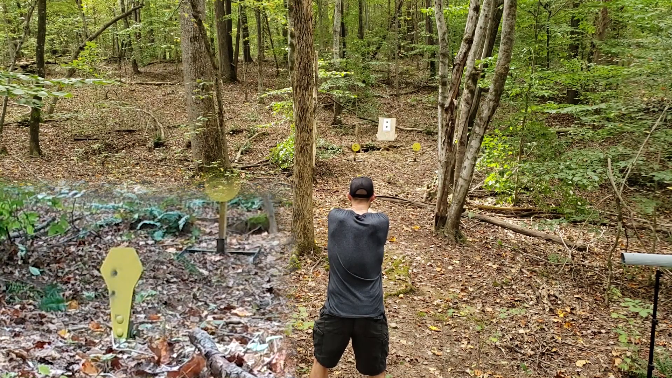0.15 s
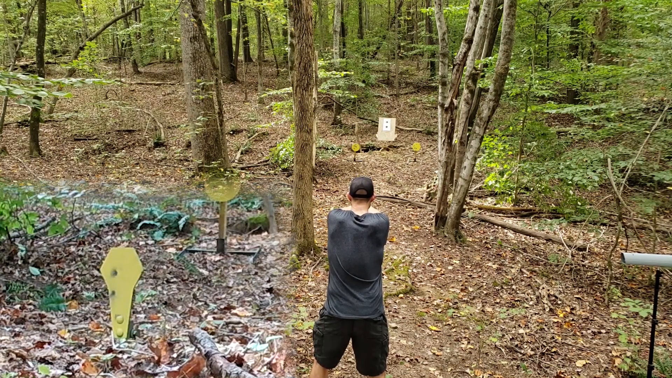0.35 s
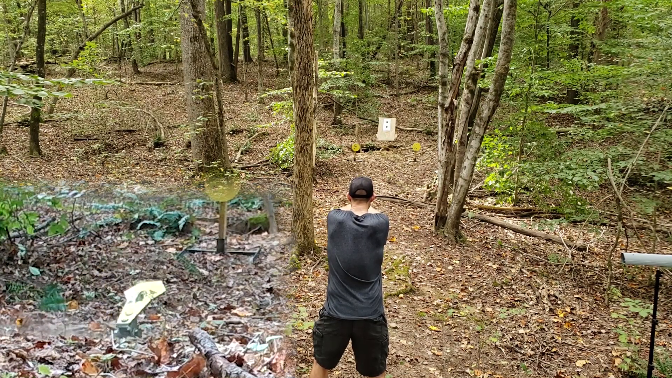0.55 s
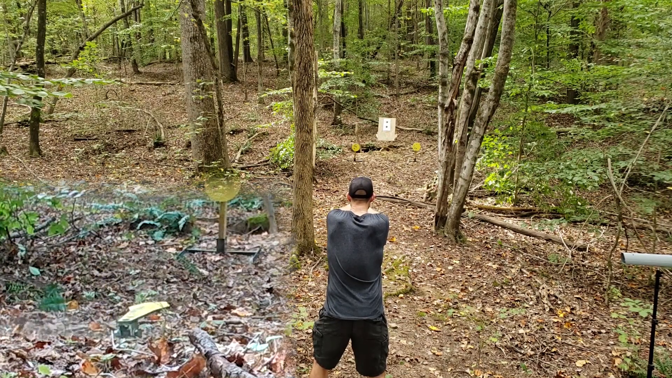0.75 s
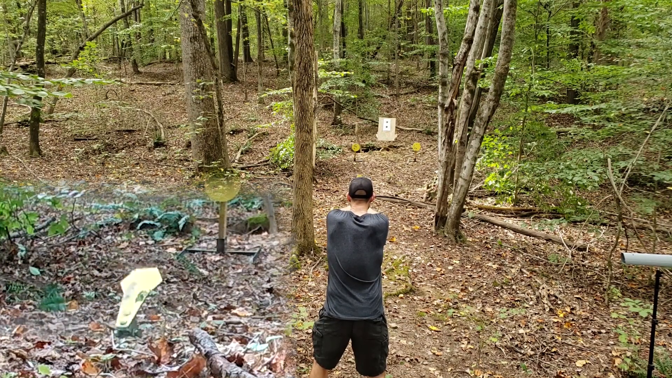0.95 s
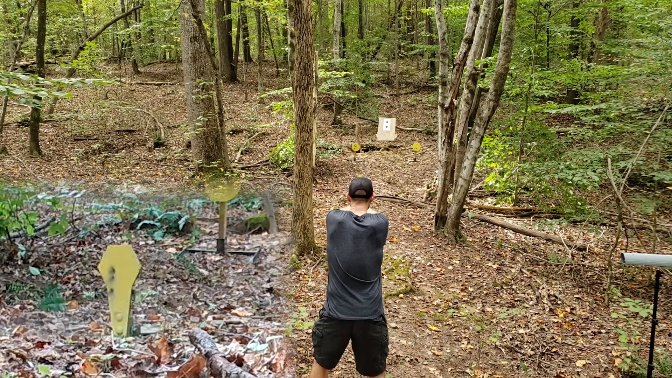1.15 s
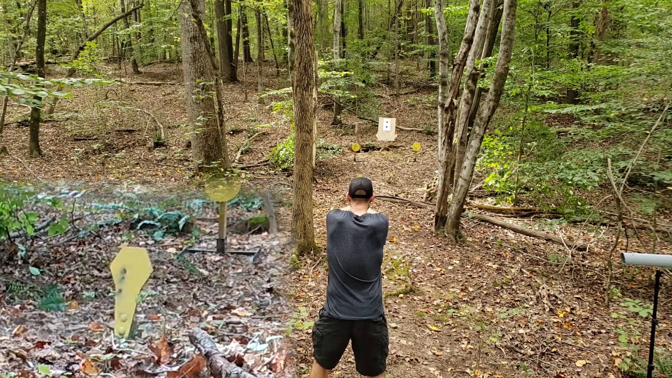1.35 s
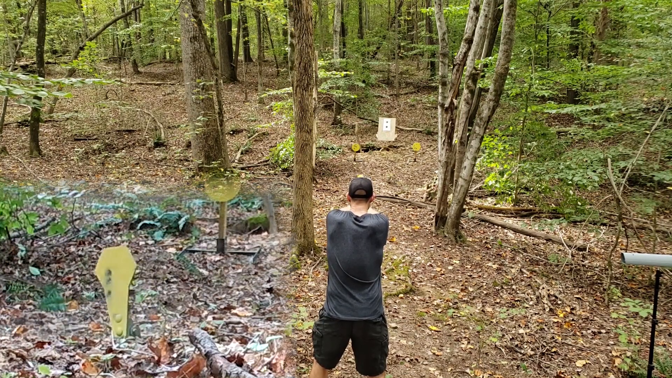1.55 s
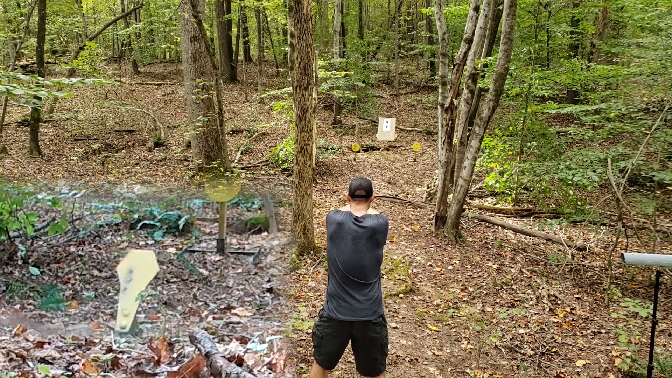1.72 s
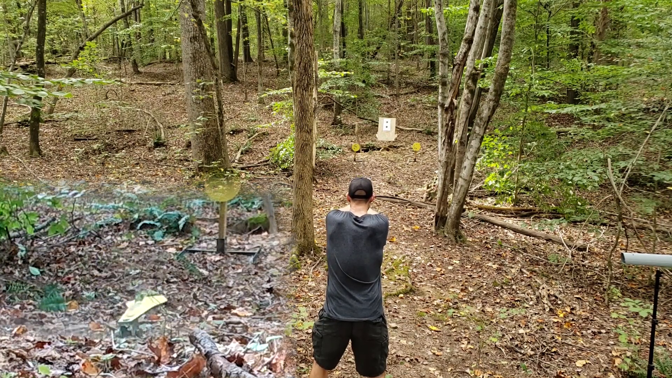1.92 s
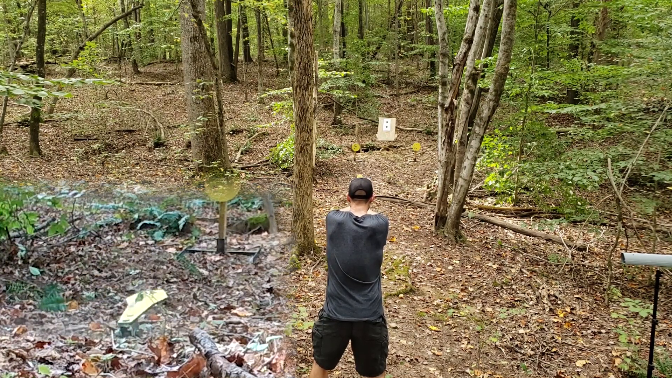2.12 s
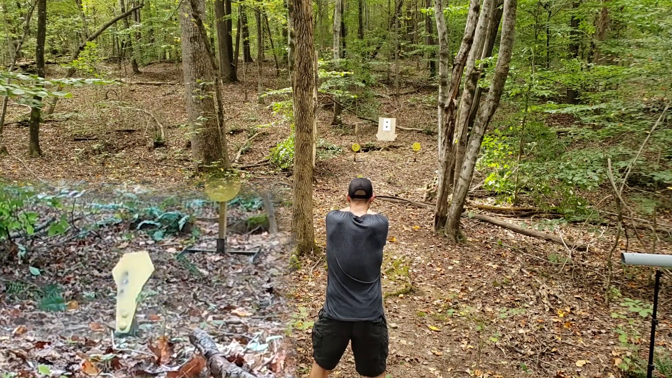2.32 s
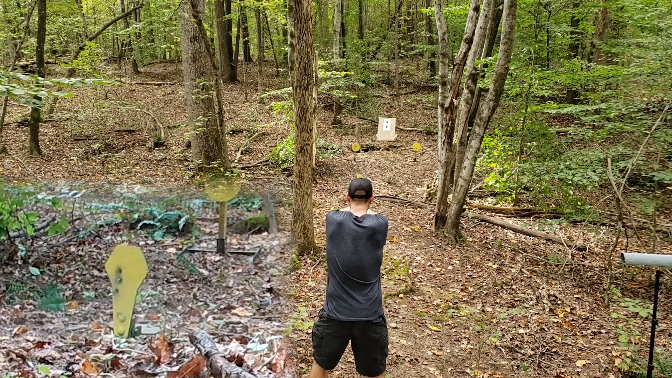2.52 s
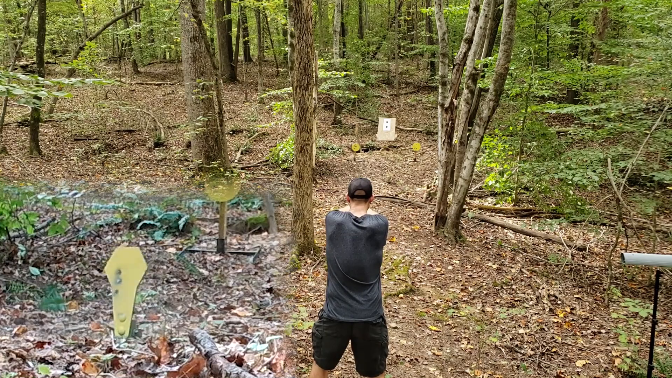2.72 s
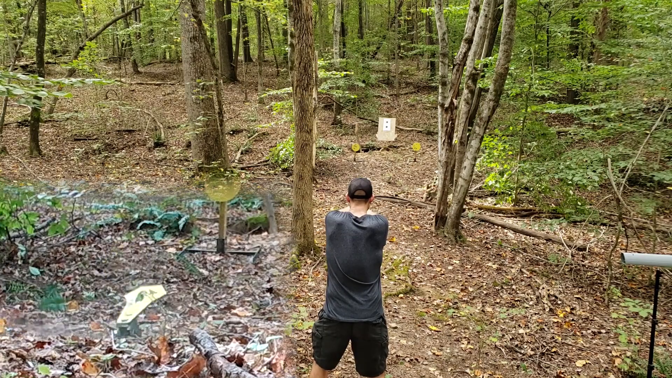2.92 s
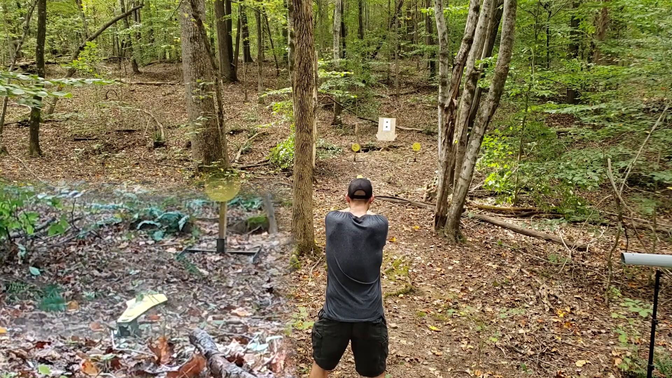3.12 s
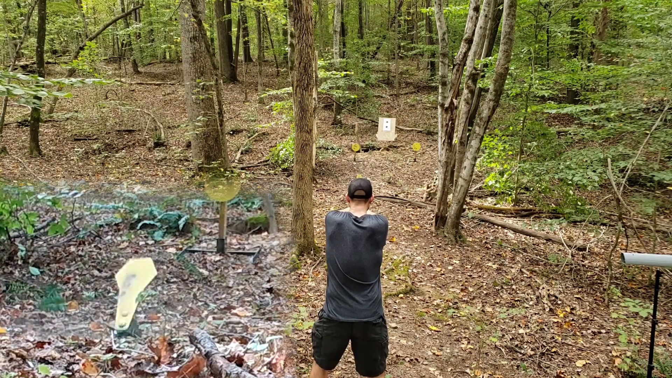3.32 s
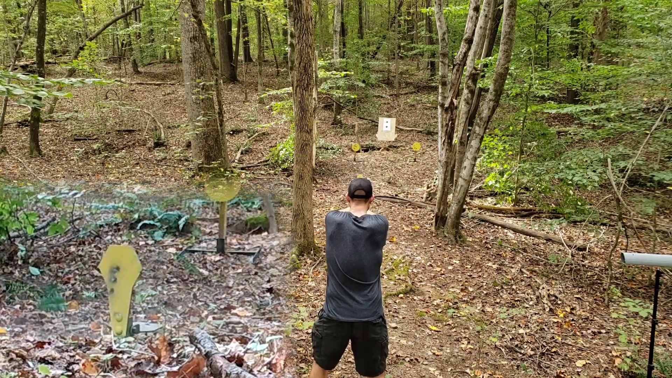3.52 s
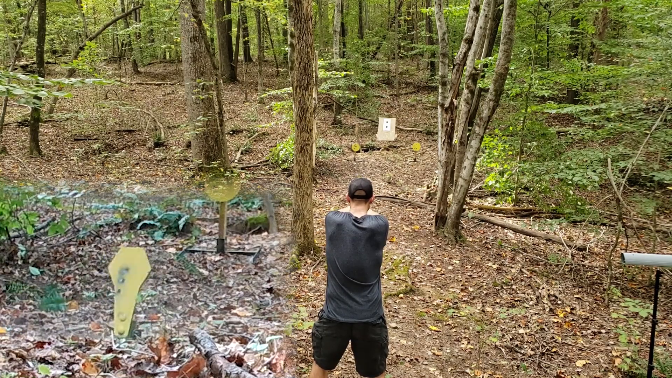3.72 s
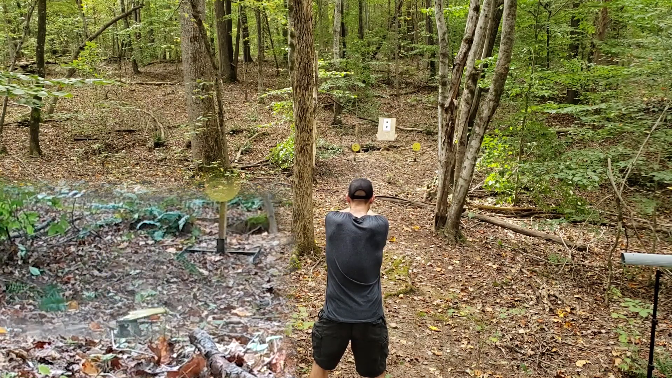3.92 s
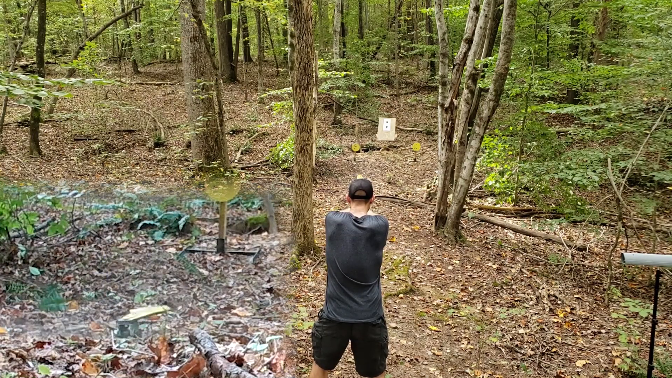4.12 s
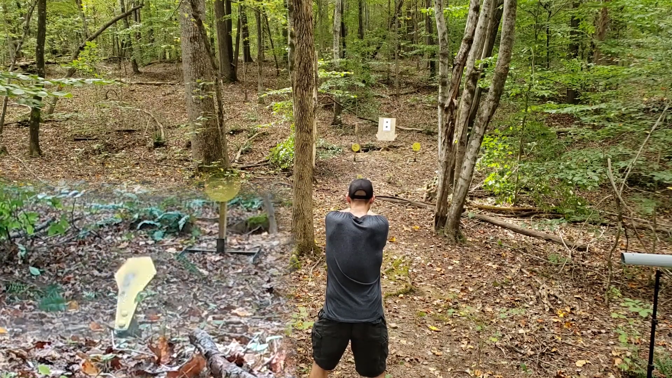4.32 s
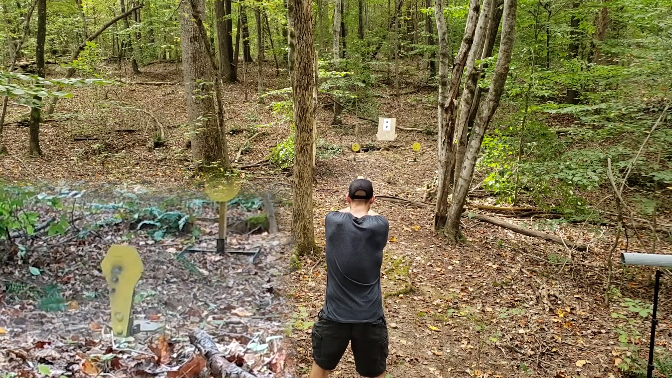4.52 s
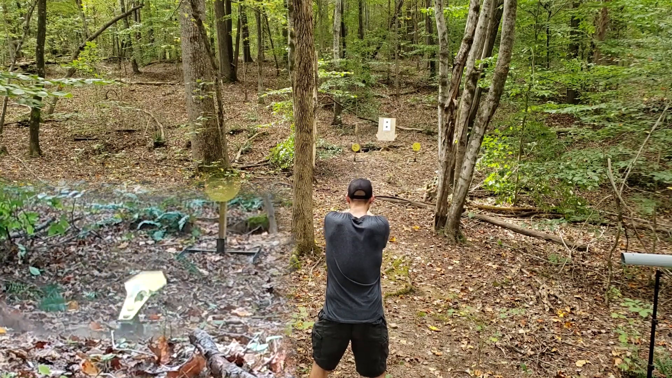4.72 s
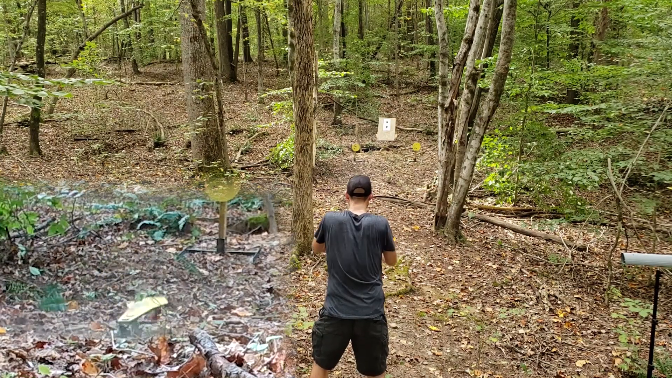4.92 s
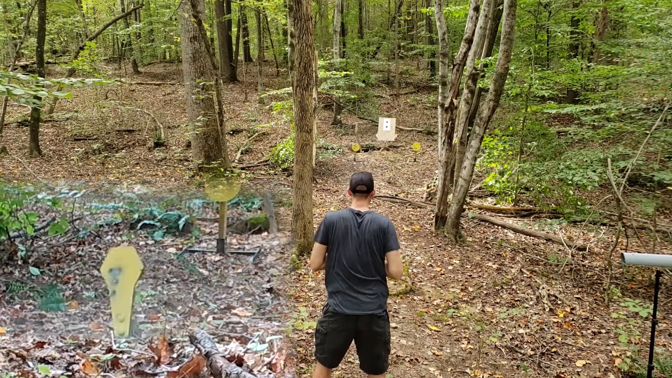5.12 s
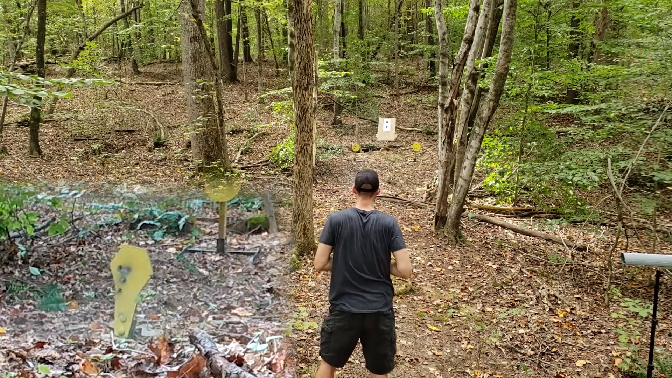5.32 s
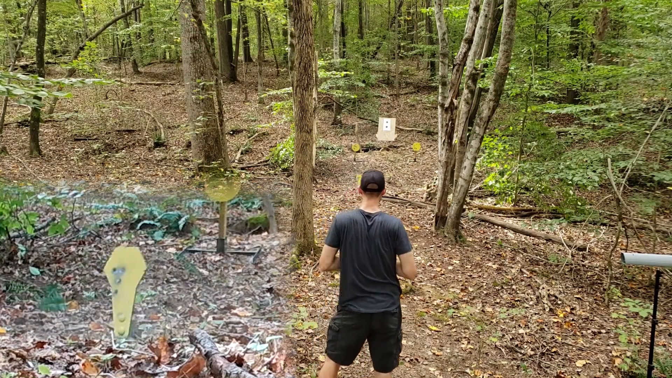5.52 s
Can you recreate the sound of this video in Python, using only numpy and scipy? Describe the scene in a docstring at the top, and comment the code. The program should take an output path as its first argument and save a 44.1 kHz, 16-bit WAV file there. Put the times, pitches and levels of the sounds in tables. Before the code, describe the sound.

A revolver fires five shots in a wood, at about 0.4, 1.7, 2.8, 3.7 and 4.6 seconds. Each is a loud, sudden bang with a short low boom that overloads the microphone. Almost at once the bullet strikes a steel plate with a sharp splat and a brief, very high ring. Quick slaps come back from nearby trunks, followed by a long echo that is still fading when the next shot arrives. After each hit the spring-loaded plate swings back against its stop with a much quieter clank, a tiny rattle and a small rebound, at about 1.1, 2.4, 3.5, 4.5 and 5.2 seconds. Beneath everything are a very soft hush of air and the faint low drone of a distant engine, which swells slightly near 0.9 seconds and slowly sinks. The last echo trails away toward the end, around 5.5 seconds.

```python
"""A revolver fires five shots at a spring-loaded steel target in a wood.
Each bang is a sudden push of gas that overloads the microphone, and the trees send back a long echo.
Each bullet makes the steel plate ring; the spring then swings the plate back to clank on its stop.
Behind it all are a soft hush of air and the drone of a far engine."""
import sys
import numpy as np
from scipy import signal
from scipy.fft import rfft, irfft, next_fast_len
from scipy.io import wavfile

SR = 44100
rng = np.random.default_rng(int(sys.argv[2]) if len(sys.argv) > 2 else 0)


def pcm_store(signal):
    """Save signal as 16-bit PCM."""
    levels = np.round(np.clip(np.atleast_2d(signal), -1, 1) * 32767)
    wavfile.write(sys.argv[1], SR, levels.astype(np.int16).T)


N = 249289
TIME = np.arange(N) / SR


def from_db(db):
    """Turns decibels into a number to multiply by."""
    return 10 ** (np.asarray(db) / 20)


def unit_level(x):
    """Scales a sound to an average (rms) level of 1."""
    return x / np.sqrt(np.mean(x ** 2) + 1e-20)


def filtered(x, hz, kind, order=2):
    """Keeps the lows, the highs or a band of a sound."""
    sections = signal.butter(order, np.minimum(hz, .45 * SR), kind, fs=SR, output="sos")
    return signal.sosfilt(sections, x + 1e-18)


def coloured(x, tone):
    """Shapes plain noise with a table of pitch_hz, level_db; the result has level 1."""
    hz, db = np.transpose(tone)
    size = next_fast_len(len(x))
    pitches_hz = np.maximum(np.fft.rfftfreq(size, 1 / SR), 1)
    gain = from_db(np.interp(np.log(pitches_hz), np.log(hz), db))
    return unit_level(irfft(rfft(x, size) * gain, size)[:len(x)])


def add(track, start_s, sound):
    """Mixes a sound into the track at start_s."""
    start = max(int(round(start_s * SR)), 0)
    track[start:start + len(sound)] += sound[:N - start]


# The tone of the air: pitch_hz, level_db
AIR_TONE = [(20, -13.5), (60, 1.5), (170, -3.5), (300, -14), (700, -16), (1500, -20.5), (2500, -34.5),
            (4000, -49), (8000, -46.5), (16000, -54.5)]

def forest_air():
    """Still air makes a steady, low hush."""
    return coloured(rng.standard_normal(N), AIR_TONE)


def far_engine(start_hz, sink_hz_per_s, waver_hz, start_db, fade_db_per_s):
    """A distant engine drones and wavers, swells once, and slowly gets lower and quieter."""
    wander = unit_level(filtered(rng.standard_normal(N + SR), waver_hz, "low")[SR:])
    pitch_hz = start_hz - sink_hz_per_s * TIME + 1.6 * wander
    hum = np.sqrt(2) * np.sin(2 * np.pi * np.cumsum(pitch_hz) / SR)
    band_hz = pitch_hz.mean() + np.array([-waver_hz, waver_hz])
    rumble = unit_level(filtered(rng.standard_normal(N + SR), band_hz, "band")[SR:])
    swell_db = 6 * np.exp(-((TIME - .88) / .33) ** 2)
    level_db = start_db - fade_db_per_s * TIME + swell_db
    return from_db(level_db) * unit_level(hum + from_db(-5) * rumble)


# Three depths of the wood, each fainter and longer: swell_s, hold_until_s, level_db, fall_db_per_s
UNDERGROWTH = (0.03, 0.0273, -14.5, 600)
NEAR_TREES = (0.01, 0.0461, -23.5, 50)
FAR_TREES = (0.22, 0.17, -36.5, 17.5)

def echo_loudness(t):
    """The echo from each depth of the wood swells, then dies away."""
    return sum(np.minimum(t / swell_s, 1) * from_db(db - fall_db_per_s * np.maximum(t - until_s, 0))
               for swell_s, until_s, db, fall_db_per_s in (UNDERGROWTH, NEAR_TREES, FAR_TREES))


# The tone of the echo: pitch_hz, level_db
ECHO_TONE = [(30, -24.5), (75, -15), (130, -3), (200, -9), (350, -3), (650, -4), (950, -3), (1900, -8),
             (3100, -21), (4000, -15.5), (5000, -23), (7100, -36), (8000, -41), (16000, -48)]
# What leaves and soft ground soak up: pitch_hz, loss_db_per_s
ECHO_LOSS = [(50, 39), (170, 15.5), (400, 3), (1200, 6), (2400, 9), (4200, 27.5), (7000, 33.5), (14000, 32)]

def wood_echo(trunks_per_s, trunk_db):
    """Sound bounces off trunks and leaves; the further it goes, the more lows and highs it loses."""
    t = TIME[:2 * SR]
    trunks = (rng.random(len(t)) < trunks_per_s / SR) * rng.standard_normal(len(t))
    leaves = rng.standard_normal(len(t))
    spectrum = rfft(coloured(leaves + from_db(trunk_db) * unit_level(trunks), ECHO_TONE))
    hz, losses = np.transpose(ECHO_LOSS)
    log_pitch = np.log(np.maximum(np.fft.rfftfreq(len(t), 1 / SR), 1))
    # Split the echo into pitch bands, so each can fade at its own speed.
    bands = [irfft(spectrum * np.interp(log_pitch, np.log(hz), share)) for share in np.eye(len(hz))]
    return sum(band * from_db(-loss * t) for band, loss in zip(bands, losses)) * echo_loudness(t)


def impact(tone, rise_s, hold_s, fade_s):
    """A blow makes a short burst of noise; fade_s is the time it takes to drop 60 dB."""
    t = TIME[:SR // 4]
    loudness = (1 - np.exp(-t / rise_s)) * from_db(-60 * np.maximum(t - hold_s, 0) / fade_s)
    return coloured(rng.standard_normal(len(t)), tone) * loudness


# The notes the steel plate rings with: pitch_hz, level_db, fade_s
PLATE_NOTES = [(2850, -16, 0.065), (4500, -21, 0.038), (6834, -11, 0.045), (6866, 0.5, 0.031),
               (7020, -14.5, 0.094), (7450, -21.5, 0.019), (11455, -12, 0.078), (11571, 2.5, 0.15),
               (11630, -19.5, .42), (11600, -24, .2)]

def plate_ring(top_db, contact_s):
    """The notes build up during the blow; where it lands sets how strong the highest ones are."""
    t = TIME[:SR // 2]
    notes = sum(from_db(db + top_db * (hz > 11500) - 60 * t / fade_s) * np.sin(2 * np.pi * hz * t)
                for hz, db, fade_s in PLATE_NOTES)
    return notes * (1 - np.exp(-t / contact_s))


# The plate swings back against its stop: start_s, knock_db, ring_db, rebound_db
CLANKS = [(1.146, -42, -52, -6), (2.429, -41.5, -57.5, -4.5), (3.469, -45, -53.5, -17),
          (4.452, -44, -55.5, -20), (5.163, -43.5, -51.5, -29)]

def stop_touches():
    """Each clank is three touches on the stop: start_s, knock_db, ring_db."""
    for start_s, knock_db, ring_db, rebound_db in CLANKS:
        yield start_s, knock_db, ring_db
        yield start_s + .018, knock_db - 7, ring_db - 7   # a quick rattle
        yield start_s + .179, knock_db + rebound_db - 7, ring_db + rebound_db   # a rebound, less thud


# The tones of lead splashing on steel and of the plate hitting its stop: pitch_hz, level_db
SPLASH_TONE = [(200, -19.5), (700, -5.5), (1330, 12.8), (2000, -5.5), (2800, -11), (4500, -7), (6200, -8.5),
               (7200, -12), (8300, -27.5), (16000, -33)]
KNOCK_TONE = [(150, -11), (450, 9.5), (900, 2.5), (1450, 2.5), (2500, -29), (4000, -26.5), (6000, -24.5),
              (7200, -39), (8500, -51), (16000, -58)]
# Bullets hitting the plate: start_s, splash_db, ring_db, top_notes_db
BULLET_HITS = [(0.4074, -6.5, -9.5, -8), (1.6965, -6, -13, -7.5), (2.7732, -7, -9.5, -20.5),
               (3.7559, -8, -7.5, -33), (4.6589, -8, -4, -26.5)]

def steel_target(echo, ring_echo_db):
    """A bullet rings the plate; then the spring throws it against its stop, a softer blow."""
    knocks, rings = np.zeros(N), np.zeros(N)
    for start_s, splash_db, ring_db, top_notes_db in BULLET_HITS:
        splash = impact(SPLASH_TONE, rise_s=.0001, hold_s=.00085, fade_s=.026)
        add(knocks, start_s, from_db(splash_db) * splash)
        add(rings, start_s, from_db(ring_db) * plate_ring(top_notes_db, contact_s=.0013))
    soft_ring = filtered(plate_ring(top_db=-22, contact_s=.0022), 8500, "low", order=6)
    for start_s, knock_db, ring_db in stop_touches():
        knock = impact(KNOCK_TONE, rise_s=.00063, hold_s=.0069, fade_s=.082)
        add(knocks, start_s, from_db(knock_db) * knock)
        add(rings, start_s, from_db(ring_db) * soft_ring)
    return knocks + rings + from_db(ring_echo_db) * signal.fftconvolve(rings, echo)[:N]


def shock_wave(t, arrivals, push_ms):
    """A sudden push of air and a longer pull, once for each arrival: delay_ms, level_db."""
    pressure = np.zeros(len(t))
    for delay_ms, level_db in arrivals:
        age = np.maximum(t * 1000 - delay_ms, 0) / push_ms
        pressure += from_db(level_db) * (age > 0) * (1 - age) * np.exp(-age)
    return pressure


# Big trunks that each send back a slap: delay_ms, level_db
BIG_TRUNKS = [(27, -6), (67, -11.5), (81.5, -9), (108, -12), (143, -9.5)]

def trunk_slaps(push_ms, low_hz, high_hz):
    """A trunk is too thin to bounce back the lows, and its bark dulls the highs."""
    # Each slap comes a second time by way of the ground.
    by_ground = [(delay_ms + 2.4, level_db - .5) for delay_ms, level_db in BIG_TRUNKS]
    slaps = shock_wave(TIME[:SR // 2], BIG_TRUNKS + by_ground, push_ms)
    return -filtered(slaps, [low_hz, high_hz], "band")


# Quick bounces off the ground, the shooter and the closest trunks: delay_ms, level_db
NEAR_BOUNCES = [(1.9, -3.5), (3.25, -13), (5.95, -11.5), (10.3, -15.5), (13.6, -9.5)]

def bang(push_ms, low_hz, high_hz, crack_db, boom_hz, boom_fade_s, boom_db):
    """The shock wave cracks and bounces nearby, while the spreading gas makes a slow boom."""
    t = TIME[:SR // 4]
    arrivals = [(0, 0)] + NEAR_BOUNCES   # the straight path comes first
    crack = filtered(shock_wave(t, arrivals, push_ms), low_hz, "high", order=1)
    boom = np.cos(2 * np.pi * boom_hz * t) * from_db(-60 * t / boom_fade_s)
    return -filtered(from_db(crack_db) * crack + from_db(boom_db) * boom, high_hz, "low")


# The five shots: start_s, bang_db, echo_db
SHOTS = [(0.385, 0.5, -2), (1.6744, 0.5, -1.5), (2.7500, 0, -2), (3.7342, -0.5, -1), (4.6377, 1, -2)]

def revolver(echo, moving_air_db, slaps_db):
    """The trees stand still, so each shot gets nearly the same echo; moving air changes it a little."""
    track = np.zeros(N)
    slaps = from_db(slaps_db) * trunk_slaps(push_ms=.98, low_hz=220, high_hz=1300)
    for start_s, bang_db, echo_db in SHOTS:
        push_ms = .94 * (1 + .02 * rng.standard_normal())   # no two cartridges burn quite alike
        shot = bang(push_ms, low_hz=300, high_hz=1200, crack_db=24.5,
                    boom_hz=71, boom_fade_s=.064, boom_db=6)
        echo_change = from_db(moving_air_db) * wood_echo(trunks_per_s=650, trunk_db=3.5)
        add(track, start_s, from_db(bang_db) * shot)
        add(track, start_s, from_db(echo_db) * slaps)
        add(track, start_s, from_db(echo_db) * (echo + echo_change))
    return track


def scene():
    """The gun and the plate share one echo of the wood, over the air and the engine."""
    echo = wood_echo(trunks_per_s=300, trunk_db=-7)
    shots = revolver(echo, moving_air_db=-9.5, slaps_db=3)
    target = steel_target(echo, ring_echo_db=-30)
    air = from_db(-57.5) * forest_air()
    engine = far_engine(start_hz=112.5, sink_hz_per_s=2.1, waver_hz=8, start_db=-50, fade_db_per_s=1.1)
    return (shots + target + air + engine)[None]


def record(dry):
    """The overloaded microphone flattens loud peaks; the highs are turned down, the very highest cut."""
    flattened = dry / (1 + dry ** 6) ** (1 / 6)
    body = signal.sosfiltfilt(signal.butter(12, 7600, fs=SR, output="sos"), flattened)
    highs = flattened - body
    top_cut = signal.cheby2(14, 60, 16600, fs=SR, output="sos")
    return signal.sosfilt(top_cut, body + from_db(-7) * highs)


dry = scene()
out = record(dry)
pcm_store(out)
```